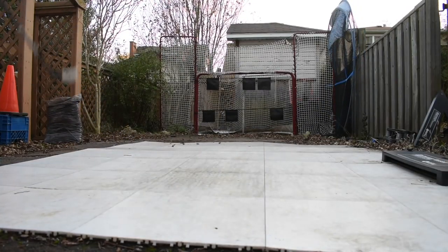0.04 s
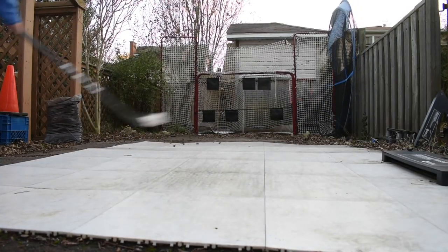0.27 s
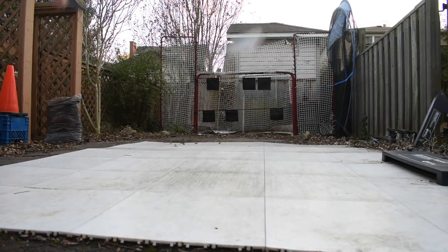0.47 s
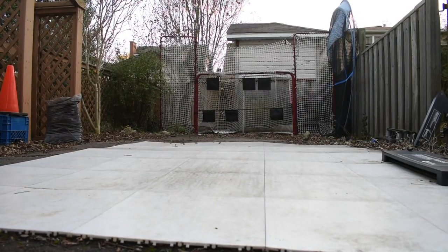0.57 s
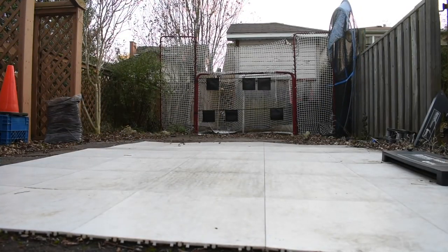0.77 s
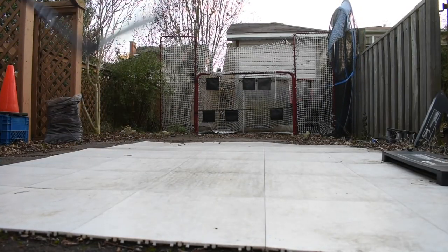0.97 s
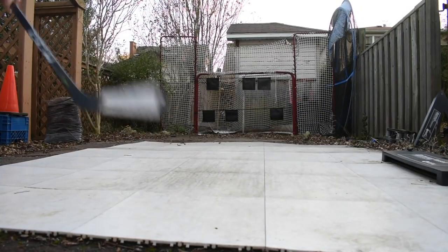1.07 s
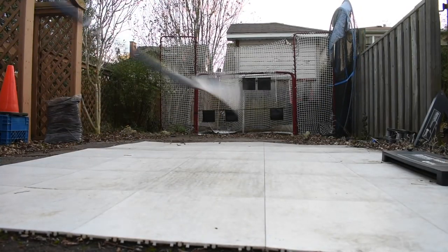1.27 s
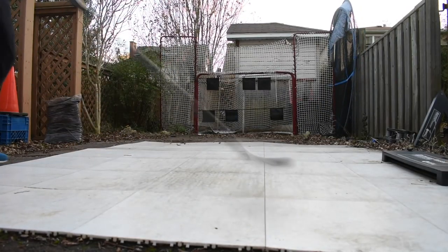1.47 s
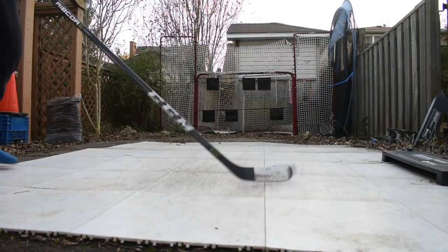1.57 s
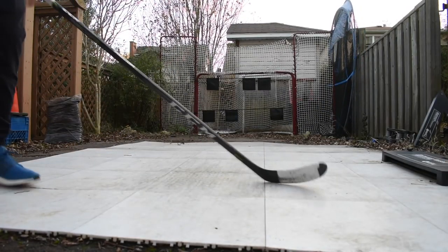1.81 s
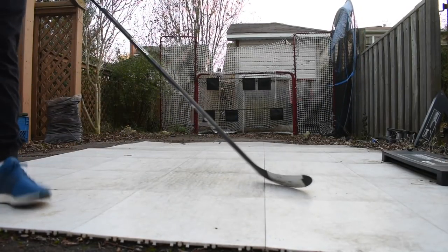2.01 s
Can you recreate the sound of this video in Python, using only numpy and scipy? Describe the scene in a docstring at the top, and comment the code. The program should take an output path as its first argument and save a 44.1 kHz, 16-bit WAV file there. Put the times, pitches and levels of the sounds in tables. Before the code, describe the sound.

A hockey stick slaps plastic tiles outdoors, after a puck clangs off a steel goal.

```python
"""Backyard hockey, off the post

A shot dies away as the puck clangs off the steel goal frame and drops to the ground. The player
steps over hollow plastic tiles in rustling clothes; the stick blade slaps down, bounces and slides.
Fences and houses answer the blows, and the loudest hits overload the microphone."""
import sys
import numpy as np
from scipy import signal
from scipy.fft import rfft, irfft, next_fast_len
from scipy.io import wavfile
from scipy.ndimage import uniform_filter1d

SR = 44100
rng = np.random.default_rng(int(sys.argv[2]) if len(sys.argv) > 2 else 0)


def generate_wav(sig):
    """Save sig (samples, or channels by samples) to the path in sys.argv[1] as 16-bit PCM at SR."""
    pcm = np.round(np.clip(np.atleast_2d(sig).T, -1, 1) * 32767).astype(np.int16)
    wavfile.write(sys.argv[1], SR, pcm)


N = 90404

# outdoor air bed (frequency [Hz], relative level [dB])
AIR_SPECTRUM = [(100, -9), (250, -14), (500, -20), (1000, -18), (2000, -29), (5000, -35), (13000, -39.5),
                (16000, -49)]
# the shot dying away (frequency [Hz], level [dB], t60 [s])
SHOT_BANDS = [(407, -62, 0.99), (1090, -43, 1.25), (2140, -47, 0.89), (4230, -50, 0.49),
              (9500, -61.5, 0.35)]
# diffuse tail of the yard (frequency [Hz], relative level [dB], t60 [s])
YARD_BANDS = [(152, -9.5, 0.84), (590, -5.5, 0.44), (1500, -9.5, 0.38), (4040, 1, 0.34),
              (10900, -10.5, 0.65)]
# near reflections (delay [s], gain [dB])
REFLECTIONS = [(.0048, -24), (.0082, -16.5), (.011, -23.5)]
# swishes of clothing, shoes and the sliding blade (time [s], level [dB], rise [s], fall [s])
SWISH_CUES = [(.425, -56.5, .03, 0.24), (0.531, -39.5, 0.023, 0.031), (.58, -49.5, 0.092, 0.22),
              (0.676, -45.5, 0.048, 0.16), (0.849, -50, 0.052, 0.11), (.935, -49, 0.065, 0.11),
              (1.07, -50, 0.084, 0.14), (1.21, -57, .025, 0.044), (1.261, -51.5, 0.01, .03),
              (1.606, -56.5, 0.058, 0.034), (1.83, -50.5, 0.01, 0.26), (1.97, -45.5, 0.014, 0.11),
              (2.04, -46, 0.075, .15)]
# tone of the swishes (frequency [Hz], relative level [dB])
SWISH_SPECTRUM = [(880, -1), (1500, -1), (2100, -4), (2320, -4), (2880, -0.5), (9280, -0.5), (13400, -7),
                  (16000, -17)]
# runs of fabric ticks (start [s], end [s], count, top level [dB])
TICK_RUNS = [(0.971, 1.112, 19, -41), (1.12, 1.6, 35, -53.5)]
# tone of the ticks (frequency [Hz], relative level [dB])
TICK_SPECTRUM = [(1500, -16), (4000, -16), (8000, -1), (12000, 5), (16000, -23)]
# soles and blade scuffing the tiles (time [s], level [dB], width [s], centre [Hz])
SCUFF_CUES = [(.43, -54, 0.051, 1650), (.94, -52.5, 0.073, 2280), (1.09, -45.5, 0.015, 1480),
              (1.274, -52.5, 0.018, 1690), (1.283, -51.5, 0.0077, 3150), (1.964, -47.5, 0.017, 2230)]
# swell of the floor rumble (time [s], relative level [dB])
RUMBLE_ENVELOPE = [(0, -47), (.1, -46), (.2, -80), (.31, -33.5), (.39, -36.5), (.44, -43.5), (.57, -44),
                   (.61, -33), (.72, -30.5), (.78, -30.5), (.81, -40), (.89, -31), (.95, -44.5), (1.0, -32),
                   (1.12, -35.5), (1.18, -41), (1.44, -43.5), (1.5, -53), (1.63, -48), (1.84, -47),
                   (1.93, -59), (2.05, -50)]
# tone of the floor rumble (frequency [Hz], relative level [dB])
RUMBLE_SPECTRUM = [(22, -31), (40, -14.5), (65, 1), (110, 0.5), (170, -3.5), (230, -9), (320, -16.5),
                   (500, -23.5), (900, -27.5), (1800, -68)]
# steps on the hollow floor (time [s], level [dB], pitch [Hz])
FOOTFALLS = [(0.341, -14, 178), (0.357, -24.5, 170), (0.3774, -23, 110), (0.711, -21.5, 88),
             (0.881, -25.5, 111), (1.012, -26.5, 75)]
# the puck landing and tiles shifting (time [s], thud gain [dB], click gain [dB])
KNOCK_CUES = [(0.2886, -28.5, -30), (.294, -31.5, -22), (0.735, -35, -56), (0.8079, -40.5, -32.5),
              (.937, -37, -49), (1.898, -40.5, -43)]
# dull body of a knock (frequency [Hz], relative level [dB], t60 [s])
THUD_BANDS = [(324, -33, 0.041), (398, -2, 0.043), (880, -7, 0.079)]
# attack of a knock (frequency [Hz], relative level [dB], t60 [s])
CLICK_BANDS = [(676, -16.5, 0.019), (1520, -2, 0.026), (2870, -8, 0.014), (5230, -31, 0.016),
               (9000, -16, 0.022)]
# mix of each blade hit (time [s], crack [dB], edge [dB], low body [dB], high body [dB])
SLAP_CUES = [(1.6448, -11, -9, -21, -25), (1.6930, -9.5, -35, -29.5, -20), (1.745, -52, -49, -35, -31.5),
             (1.876, -56, -51, -49, -41.5)]
# crack of the blade (frequency [Hz], relative level [dB], t60 [s])
SLAP_CRACK_BANDS = [(520, -14.5, 0.034), (1490, -8, 0.02), (4010, -12, 0.025), (6700, -8.5, 0.015),
                    (9900, -12, 0.0063)]
# sharp top edge of the slap (frequency [Hz], relative level [dB], t60 [s])
SLAP_EDGE_BANDS = [(6100, -13, 0.0123), (9600, 2, 0.0049), (11700, -11, 0.0039), (15520, -14, 0.0026)]
# low body of the tiles (frequency [Hz], relative level [dB], t60 [s])
TILE_LOW_BANDS = [(226, -16.5, 0.095), (332, -1.5, 0.067), (553, -2, 0.18), (930, -1, 0.059)]
# high body of the tiles (frequency [Hz], relative level [dB], t60 [s])
TILE_HIGH_BANDS = [(910, -13.5, 0.33), (1530, -7, 0.17), (2680, -8, 0.067), (5630, -12, 0.04),
                   (10750, -36, 0.042)]
# ring of blade and shaft (frequency [Hz], relative level [dB], t60 [s])
STICK_MODES = [(319.7, -2.5, 0.09), (424, -12, .42), (476, -11, 1), (634.2, 2, 0.36), (742, -0.5, 0.23),
               (960, -5.5, 0.093), (1179, -3, 0.12), (1276, -3.5, .22), (1491, 6, 0.15), (1504, -1.5, 0.26),
               (1759, 4, .18), (2094, -16, .18), (2600, -1, 0.092), (3740, -12, 0.062)]
# ring of the steel frame (frequency [Hz], relative level [dB], t60 [s])
FRAME_MODES = [(952.5, -1, 0.35), (2088, -4, 0.68), (2146, -11.5, 1.14), (2310, -4, 0.47),
               (2449, -12.5, 0.56), (3130, -12.5, 0.18), (3845, -3, .2), (4430, -6, .3), (6010, -5.5, .25),
               (6141, 5.5, 0.21), (6280, -7.5, .22), (6451, 1, 0.1), (7773, -7, 0.17), (11500, -5.5, 0.17)]
# wash of the frame's crowded modes (frequency [Hz], relative level [dB], t60 [s])
CLASH_BANDS = [(151.4, -26.5, 0.15), (435, -18.5, 0.16), (960, -12.5, 0.28), (2190, -15, 0.72),
               (3980, -5, 0.28), (6750, -8, 0.27), (9000, -12.5, 0.22), (11500, -6, .2), (14800, -15, 0.13)]
# the puck's contact with the steel (frequency [Hz], relative level [dB], t60 [s])
PUCK_CRACK_BANDS = [(150, -18.5, 0.025), (700, -0.5, 0.01), (2430, 3.5, 0.012), (6000, -1.5, 0.062),
                    (12000, -22.5, 0.022)]
# the clang's long answer from the houses (frequency [Hz], level [dB], t60 [s])
HOUSE_BANDS = [(526, -53, 2.5), (1180, -39.5, 1.25), (2204, -42, 1.4), (4500, -38, 0.81), (11000, -55, .6)]


def amp(db):
    return 10 ** (np.asarray(db) / 20)


def unit(x):
    return x / np.sqrt(np.mean(x ** 2) + 1e-20)


def clock():
    return np.arange(N) / SR


def decay(t, t60):
    return np.exp(-np.log(1000) * t / t60)


def add(out, start_s, x):
    """Mix x into out from start_s on."""
    i = int(np.clip(round(start_s * SR), 0, N - 1))
    out[i:] += x[:N - i]


def filtered(x, response):
    """Equalise x with a gain curve over frequency."""
    size = next_fast_len(N + 8192)
    return irfft(rfft(x, size) * response(np.fft.rfftfreq(size, 1 / SR)), size)[:N]


def noise(spectrum):
    """Coloured noise of rms 1."""
    points, db = np.transpose(spectrum)
    white = rng.standard_normal(N)
    return unit(filtered(white, lambda hz: amp(np.interp(np.log(hz + 1), np.log(points + 1), db))))


def burst(bands, size=32768):
    """A noise hit whose overlapping bands each die at their own speed."""
    t, log_hz = np.arange(size) / SR, np.log(np.fft.rfftfreq(size, 1 / SR) + 1)
    centres = np.log([band[0] for band in bands])
    edges = np.r_[centres[0] - 1, centres, centres[-1] + .5]
    white, out = rfft(rng.standard_normal(size)), np.zeros(N)
    for k, (_, db, t60) in enumerate(bands):
        band = unit(irfft(white * np.interp(log_hz, edges[k:k + 3], [0, 1, 0])))
        out[:size] += amp(db) * band * decay(t, t60)
    return out


def ring(modes, scatter_db, drift):
    """Damped modes, balanced differently at each blow, their phases wandering."""
    t, out = clock(), np.zeros(N)
    draws = rng.standard_normal((len(modes), 2))
    wanders = drift * np.cumsum(rng.standard_normal((len(modes), N)), axis=1) / np.sqrt(SR)
    for (hz, db, t60), (scatter, phase), wander in zip(modes, draws, wanders):
        tone = np.sin(2 * np.pi * (hz * t + phase + wander))
        out += amp(db + scatter_db * scatter) * decay(t, t60) * tone
    return out


def air(level_db=-54.5):
    """A faint, steady bed of outdoor air."""
    return amp(level_db) * noise(AIR_SPECTRUM)


def shot_tail():
    """The shot's wash of noise dies away, treble first."""
    return burst(SHOT_BANDS)


def yard(x, tail_db=-13.5, predelay_s=.012):
    """Fences and houses add near reflections and a diffuse tail to x."""
    echo = np.zeros(N)
    add(echo, predelay_s, amp(tail_db) * unit(burst(YARD_BANDS)) / np.sqrt(N))
    for delay, db in REFLECTIONS:
        add(echo, delay, amp(db) * signal.unit_impulse(N))
    return x + signal.fftconvolve(x, echo)[:N]


def rustle(grain_db=2.0, tick_t60_s=.008):
    """Cloth, shoes and the sliding blade make grainy swishes, sprinkled with fabric ticks."""
    t, power = clock(), np.zeros(N)
    for at, db, rise, fall in SWISH_CUES:
        power += amp(db) ** 2 * np.exp(-4 * np.where(t < at, ((at - t) / rise) ** 2, (t - at) / fall))
    grain = unit(uniform_filter1d(rng.standard_normal(N), size=90))
    swishes = np.sqrt(power) * unit(noise(SWISH_SPECTRUM) * amp(grain_db * grain))
    tick_envelope, fizz = np.zeros(N), noise(TICK_SPECTRUM)
    fade = decay(t, tick_t60_s)
    for start, end, count, db in TICK_RUNS:
        for when, softness in rng.random((int(count), 2)):
            add(tick_envelope, start + when * (end - start), amp(db - 10 * softness) * fade)
    return swishes + tick_envelope * fizz


def scuffs(spread_octaves=.66):
    """Short rubs on the plastic, each a swell of noise around its own pitch."""
    t, out = clock(), np.zeros(N)
    for at, db, width, centre in SCUFF_CUES:
        white = rng.standard_normal(N)
        rub = filtered(white, lambda hz: np.exp(-(np.log2((hz + 1) / centre) / spread_octaves) ** 2 / 2))
        out += amp(db) * unit(rub) * np.exp(-((t - at) / width) ** 2)
    return out


def footsteps(width_cycles=.48, rumble_trim_db=-4.0):
    """Each footfall gives the hollow floor one soft push, over its low rumble."""
    t, thumps = clock(), np.zeros(N)
    for at, db, hz in FOOTFALLS:
        cycles = (t - at) * hz
        thumps += amp(db) * np.cos(2 * np.pi * cycles) * np.exp(-(cycles / width_cycles) ** 2)
    rumble_db = np.interp(t, *np.transpose(RUMBLE_ENVELOPE)) + rumble_trim_db
    return thumps + amp(rumble_db) * noise(RUMBLE_SPECTRUM)


def knocks():
    """The puck lands and tiles shift: small dead contacts, each a thud and a click."""
    out = np.zeros(N)
    for at, thud_db, click_db in KNOCK_CUES:
        add(out, at, amp(thud_db) * burst(THUD_BANDS) + amp(click_db) * burst(CLICK_BANDS))
    return out


def stick(crossover_hz=1000, ring_db=-8.5, rest_s=1.785, choke_db=-13, choke_s=.0088):
    """The blade lands with a deep clack and bounces brighter; coming to rest chokes its ring."""
    contacts, ringing = np.zeros(N), np.zeros(N)
    for at, crack_db, edge_db, low_db, high_db in SLAP_CUES:
        tiles = amp(low_db) * burst(TILE_LOW_BANDS) + amp(high_db) * burst(TILE_HIGH_BANDS)
        attack = amp(crack_db) * burst(SLAP_CRACK_BANDS) + amp(edge_db) * burst(SLAP_EDGE_BANDS)
        add(contacts, at, attack + tiles)
        modes = [(hz, db + (low_db if hz < crossover_hz else high_db), t60)
                 for hz, db, t60 in STICK_MODES]
        add(ringing, at, ring(modes, scatter_db=3, drift=.7))
    settled = np.clip((clock() - rest_s) / choke_s, 0, 1)
    return contacts + amp(ring_db + choke_db * settled) * ringing


def goal_clang(hit_s=.1112, ring_db=-24, clash_db=-18, crack_db=-13):
    """The puck cracks against the steel tube, which rings on while the houses answer."""
    tube = amp(ring_db) * ring(FRAME_MODES, scatter_db=-2.5, drift=.55)
    clash = amp(clash_db) * burst(CLASH_BANDS)
    crack = amp(crack_db) * burst(PUCK_CRACK_BANDS)
    out = np.zeros(N)
    add(out, hit_s, tube + clash + crack + burst(HOUSE_BANDS))
    return out


def scene():
    """Mono mix: close hits in the yard's reverb, the far layers, and the player's dry foley."""
    near = yard(stick() + knocks())
    far = goal_clang() + shot_tail() + air()
    return (near + far + footsteps() + rustle() + scuffs())[None]


def record(dry):
    """The microphone rounds off the loudest peaks and cuts the very top of the treble."""
    ceiling, cutoff_hz = .42, 16300
    clipped = dry[0] / (1 + np.abs(dry[0] / ceiling) ** 6) ** (1 / 6)
    return filtered(clipped, lambda hz: 1 / (1 + (hz / cutoff_hz) ** 90))[None]


dry = scene()
out = record(dry)
generate_wav(out)
```